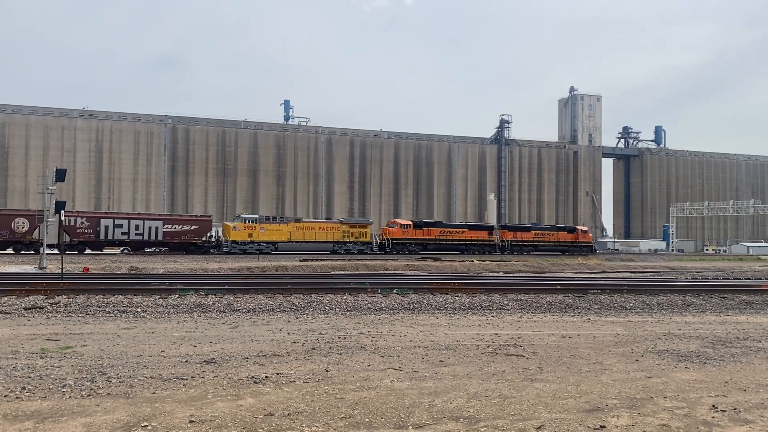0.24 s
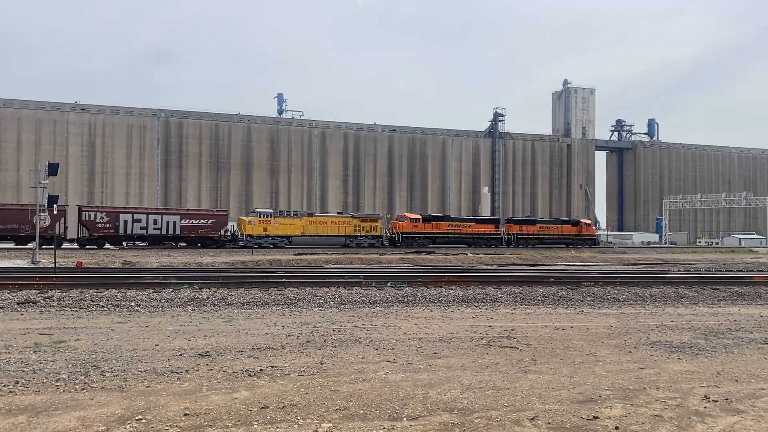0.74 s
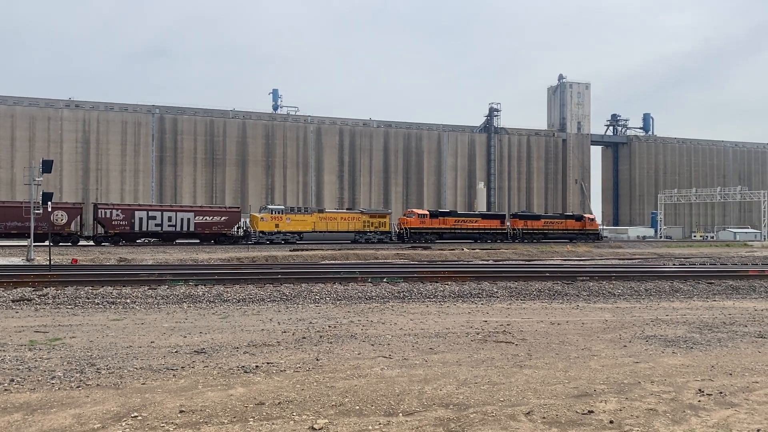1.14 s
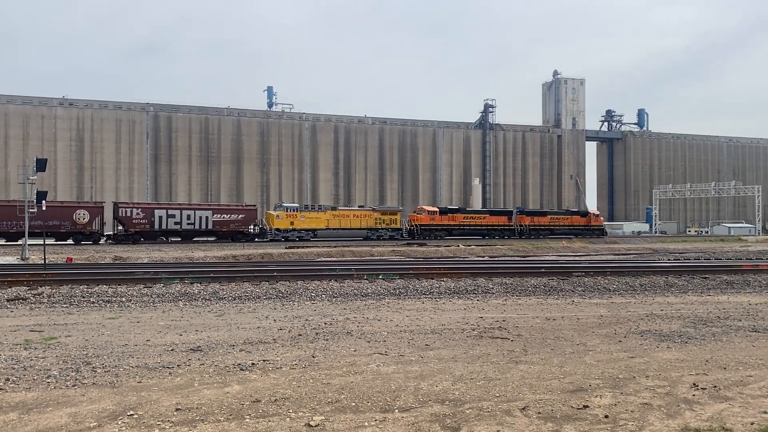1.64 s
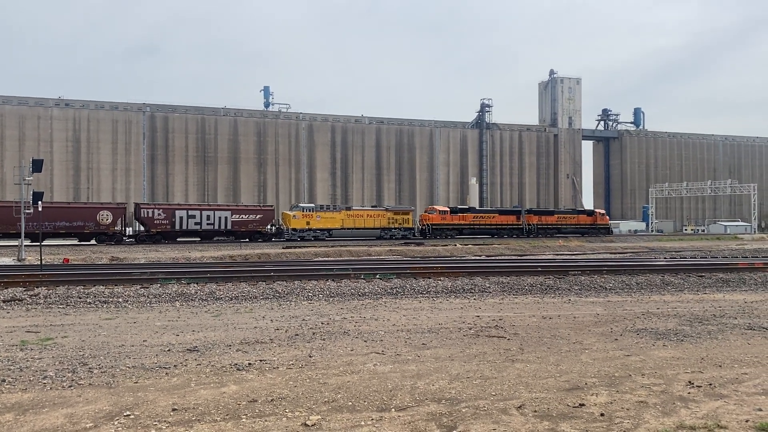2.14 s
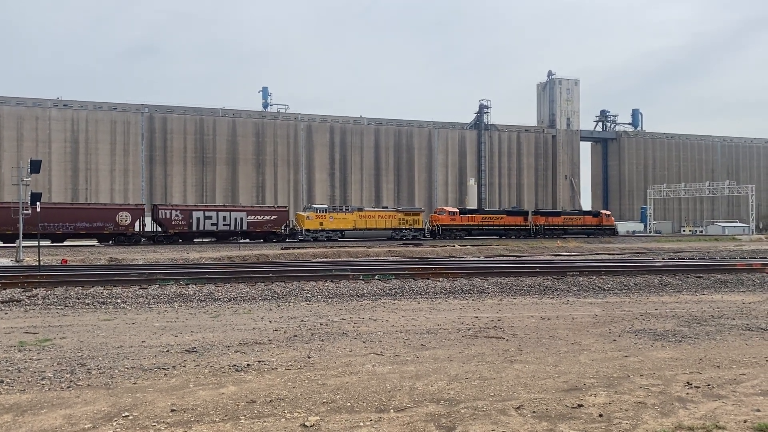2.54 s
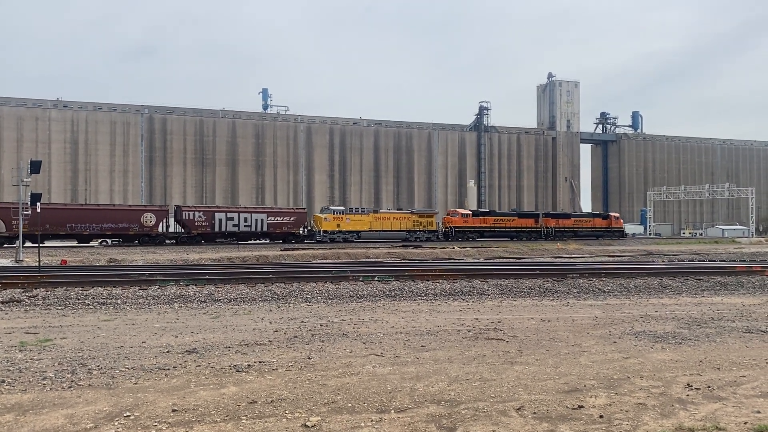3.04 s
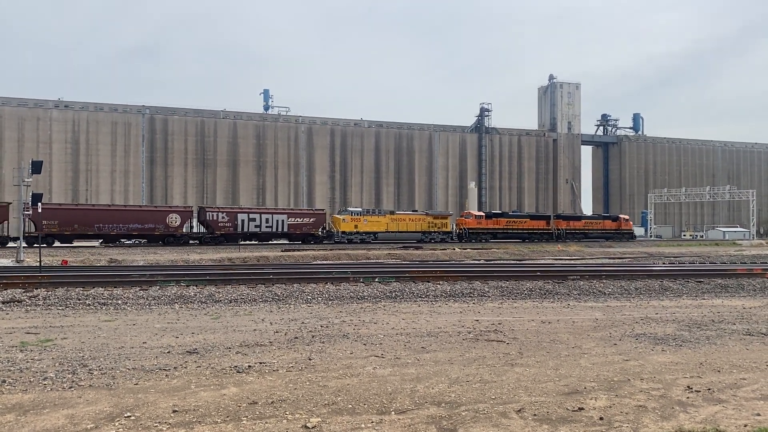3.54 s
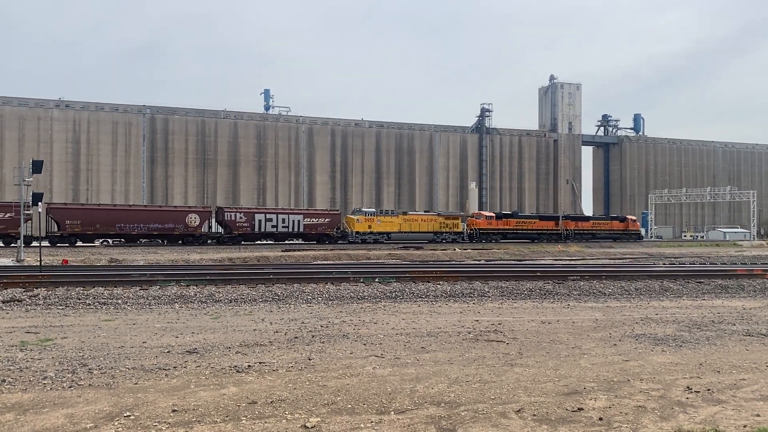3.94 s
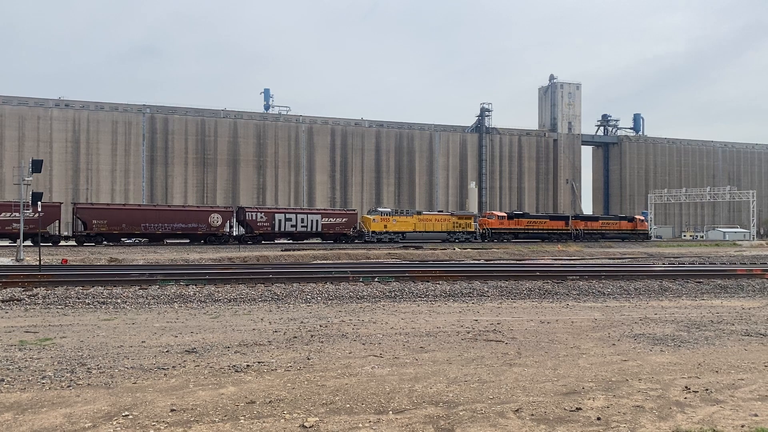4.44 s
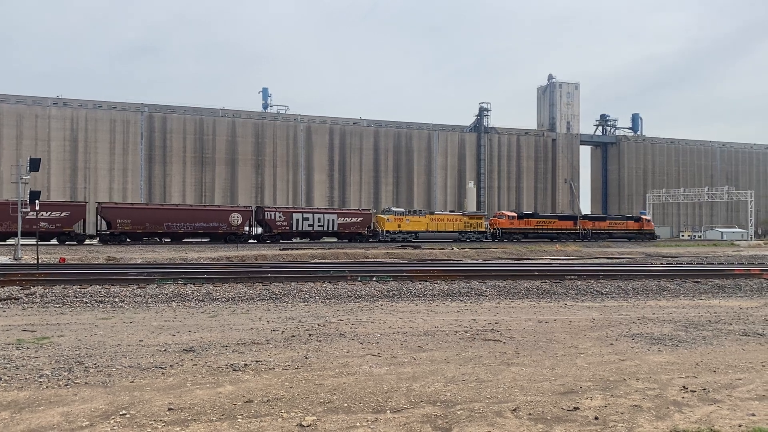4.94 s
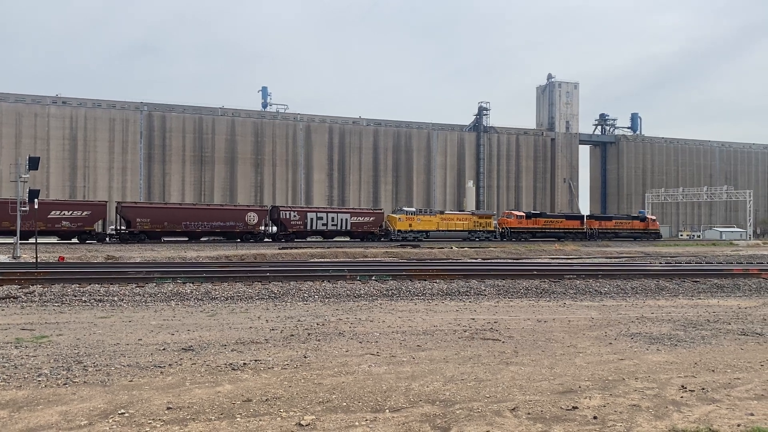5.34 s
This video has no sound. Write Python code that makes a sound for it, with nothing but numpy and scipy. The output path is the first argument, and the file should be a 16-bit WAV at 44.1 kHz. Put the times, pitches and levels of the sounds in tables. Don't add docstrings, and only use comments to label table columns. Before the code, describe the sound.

Two distant diesel locomotives throb low under gusty wind while freight wheels sing thinly on rails and couplers knock and ring in an open yard.

```python
import sys
import numpy as np
from scipy import signal
from scipy.fft import rfft, irfft, next_fast_len
from scipy.io import wavfile
from scipy.ndimage import uniform_filter1d

SR = 44100
rng = np.random.default_rng(int(sys.argv[2]) if len(sys.argv) > 2 else 0)


def boost_factor(decibels):
    exponent = np.asarray(decibels, float) / 20
    return 10 ** exponent


def materialize(psi):
    bounded = np.clip(np.atleast_2d(psi).T, -1, 1)
    quanta = np.round(bounded * 32767).astype(np.int16)
    wavfile.write(sys.argv[1], SR, quanta)


N = 246519
SPAN = next_fast_len(N)


def rms_one(x):
    return x / np.sqrt(np.mean(x ** 2) + 1e-20)


def in_time(rows):
    s, *columns = np.transpose(rows)
    return [np.interp(np.arange(N) / SR, s, c) for c in columns]


def at_hz(points, hz, axis=1):
    points = np.array(points)
    return np.interp(np.log(hz), np.log(points[:, 0]), points[:, axis])


def add(out, s, sound):
    at = int(s * SR)
    out[at:at + len(sound)] += sound[:N - at]


def drift(rate):
    r = np.exp(-80 * np.pi * rate / SR)
    chance = rng.standard_normal(N // 40 + 2002)
    slow = signal.lfilter([1], [1, -2 * r, r * r], chance)[2000:]
    return np.interp(np.arange(N) / 40, np.arange(len(slow)), rms_one(slow))


def coloured(spectrum, patchy_db, rate, modes=(), wake=1):
    hz = np.maximum(np.arange(SPAN // 2 + 1) * SR / SPAN, 1)
    low_hz, high_hz = spectrum[0][0], spectrum[-1][0]
    inside = (hz > low_hz) & (hz < high_hz)
    shaped = rfft(rng.standard_normal(SPAN)) * boost_factor(at_hz(spectrum, hz)) * inside
    boost = 1
    for top_hz, width, db in modes:
        boost = boost + (wake * boost_factor(db)) ** 2 / (1 + (2 * (hz - top_hz) / width) ** 2)
    shaped *= np.sqrt(boost)
    out, together = 0, drift(rate)
    for octave in range(int(np.log2(low_hz)), int(np.log2(high_hz)) + 2):
        share = np.maximum(1 - abs(np.log2(hz) - octave), 0)
        band = irfft(shaped * share, SPAN)[:N]
        out = out + band * boost_factor(patchy_db * (together + drift(rate)))
    return rms_one(out)


def evened(x, seconds, share):
    power = uniform_filter1d(x ** 2, max(int(seconds * SR), 1))
    return rms_one(x / (power + 1e-3) ** (np.clip(share, 0, 1) / 2))


def spell(s, length, rise, fall):
    t = np.arange(N) / SR - s
    return np.minimum(rise * t, 0) - fall * np.maximum(t - length, 0)


def ring(hz, db, t60, rise_s, size):
    age = np.arange(size) / SR
    modes = boost_factor(db - 60 * age / t60) * np.sin(2 * np.pi * hz * age)
    return (1 - np.exp(-age / rise_s)) * np.atleast_2d(modes).sum(axis=0)


def exhaust(orders, cycle_hz, start_s, level_db):
    turns = cycle_hz * (np.arange(N) / SR - start_s)
    waver_db = 0.7
    tones = 0
    for k, db in orders:
        tones = tones + boost_factor(db + waver_db * drift(0.35)) * np.cos(2 * np.pi * k * turns)
    return np.sqrt(2) * boost_factor(level_db) * tones


# t/s, lead engine level/dB, trailing engine level/dB
EXHAUST_LEVELS = [(0, -23, -41), (.6, -23, -40), (.85, -21.5, -40), (1.1, -23, -41), (1.4, -44, -42),
                  (1.8, -32, -36), (2.2, -25, -32), (2.6, -27, -28.5), (3.0, -27, -26), (3.4, -31, -25),
                  (3.8, -30, -26), (4.2, -29, -27.5), (4.6, -30, -24.5), (5.0, -33, -25.5),
                  (5.59, -42, -26)]
# multiple of the cycle rate, level/dB
LEAD_TONES = [(12, -9), (16, 0), (18, -10), (20, -16)]
# multiple of the cycle rate, level/dB
TRAILING_TONES = [(13, -8), (15, 0), (17, -2), (19, -14), (24, -13)]


def engines():
    lead_db, trailing_db = in_time(EXHAUST_LEVELS)
    lead = exhaust(LEAD_TONES, cycle_hz=4.4375, start_s=.0168, level_db=lead_db)
    trailing = exhaust(TRAILING_TONES, cycle_hz=4.434, start_s=.1015, level_db=trailing_db)
    return lead + trailing


# t/s, length/s, roar change level/dB, wind
# change level/dB
GUST_SWINGS = [(0.0, 0.055, -29, 10), (0.093, 0.059, 10.5, -3), (0.237, 0.12, 8.5, 4.5),
               (0.502, 0.15, 9, 10), (0.668, 0.16, 9, -1.5), (0.781, 0.09, -4, 8), (0.978, 0.048, 8, 5),
               (1.144, 0.12, 13, -5), (1.27, 0.085, 6, 14), (1.466, 0.074, -2, 2), (1.59, 0.088, -5, 7.5),
               (1.746, 0.12, -5, 7.5), (1.838, .13, 3, 4), (2.256, 0.58, 3.5, -1), (2.545, 0.29, 2, 1),
               (3.516, 0.23, 7, -2), (3.594, 0.066, -3, 5), (1.357, .06, -9, 7), (2.15, .08, -7, 4),
               (2.38, 0.071, -1, -12), (2.92, 0.099, -7, -0.5), (1.042, .05, -7, -2), (2.65, .08, 3, 1.5),
               (3.153, 0.095, -4, 4), (5.42, .3, 0.5, -1), (3.727, 0.11, 9, 4), (3.858, 0.064, 7.5, -1),
               (3.96, 0.042, 3, -4), (4.102, 0.072, -0.5, -4), (4.15, 0.17, 7.5, 3),
               (4.326, 0.051, 12.5, 1), (4.725, 0.056, 5, 4), (5.26, 0.12, 3.5, 4), (5.375, 0.14, 6.5, -8),
               (5.526, 0.11, 11, -30)]


def gusting():
    t = np.arange(N) / SR
    swells = np.array([np.maximum(1 - abs(t - s) / (0.65 * length), 0) for s, length, *_ in GUST_SWINGS])
    between_gusts_db = np.array([[-33.5], [-44]])
    return between_gusts_db + np.array(GUST_SWINGS)[:, 2:].T @ swells


# f/Hz, level/dB per Hz
ROAR_COLOUR = [(25, -22), (40, -7.5), (57, 2.5), (70, 3.5), (84, 4), (100, -2.5), (140, -10), (220, -19),
               (350, -30.5), (700, -35), (1000, -36), (1800, -74)]


def roar(level_db):
    return boost_factor(level_db + 5.5) * coloured(ROAR_COLOUR, patchy_db=.5, rate=2.6)


# f/Hz, level/dB per Hz
WIND_COLOUR = [(25, -36), (50, -4.5), (100, 1), (180, -8), (300, -10), (500, -29.5)]


def buffeting():
    return evened(coloured(WIND_COLOUR, patchy_db=0.0, rate=9.7), seconds=0.13, share=0.27)


def hum(hz, width):
    chance = rng.standard_normal(N)
    slow = signal.butter(2, 22, fs=SR, output="sos")
    wander = rms_one(signal.sosfilt(slow, chance))
    flicker = rms_one(signal.sosfilt(slow, chance[::-1]))
    pitch = hz + 0.7 * width * wander
    return rms_one(boost_factor(2.3 * flicker) * np.sin(2 * np.pi * np.cumsum(pitch) / SR))


# t/s, length/s, level/dB
FIRST_SONGS = [
    [(.02, 0.17, -47), (.3, 0.19, -49), (.58, 0.22, -52), (.9, 0.18, -49.5), (1.6, 0.25, -51.5),
     (2.0, 0.42, -57), (3.15, 0.019, -51), (3.3, 0.27, -43.5), (3.63, 0.021, -53), (3.72, 0.1, -42),
     (3.9, 0.027, -45), (4.03, .04, -46), (4.17, 0.13, -47)],
    [(.03, 0.096, -54.5), (.22, 0.18, -49.5), (.45, 0.22, -49), (.73, 0.17, -53), (.89, 0.15, -49.5),
     (1.08, 0.16, -49), (1.3, 0.21, -52), (1.6, 0.053, -53), (1.74, 0.05, -43.5), (1.98, 0.062, -53),
     (2.12, 0.061, -47.5), (2.25, 0.13, -51), (2.52, 0.12, -52.5), (2.9, 0.029, -54.5), (3.06, 0.1, -47.5),
     (3.24, 0.082, -52), (3.42, 0.14, -49.5), (3.72, 0.097, -48.5), (3.95, 0.068, -44.5), (4.14, 0.32, -49),
     (4.54, 0.062, -54), (4.67, 0.029, -46.5), (4.78, 0.11, -51.5), (4.97, 0.06, -56), (5.05, 0.078, -45.5),
     (5.28, 0.074, -52.5)],
]
# t/s, length/s, level/dB
OTHER_SONGS = [
    [(.06, .08, -53), (.42, 0.67, -54), (1.06, .03, -67), (1.15, 0.85, -56.5), (2.28, 0.081, -59),
     (2.47, 0.057, -50.5), (2.6, 0.048, -51), (2.73, .03, -52), (2.89, 0.035, -55), (3.22, 0.094, -50),
     (3.36, 0.076, -50.5), (3.48, .07, -51), (3.6, .4, -75), (3.97, 0.036, -48), (4.06, .03, -67),
     (4.14, 0.068, -48), (4.3, 0.14, -50), (4.5, 0.04, -48), (4.6, 0.044, -54), (4.8, 0.14, -58),
     (5.33, 0.068, -50), (5.55, .05, -53)],
    [(0, 0.98, -55), (1.6, .2, -65), (3.3, 0.74, -51), (4.125, 0.081, -48.5)],
    [(5.065, .12, -47), (5.2, .05, -55)],
    [(3.95, .1, -58), (4.33, .08, -54), (4.59, .06, -54)],
    [(.08, 0.047, -56), (.58, 0.032, -51), (.69, 0.079, -47.5), (.82, .08, -51), (.94, .02, -62),
     (3.4, 0.18, -51.5), (3.7, 0.52, -60)],
    [(.1, 0.089, -53), (.6, 0.22, -51), (.93, 0.18, -49.5), (3.6, 0.61, -54)],
]
# f/Hz, width/Hz, level/dB, which wheel (from 0)
WHEEL_TONES = [(1768, 22, -7, 0), (1846, 11, -2, 0), (2518, 6, 1, 1), (3924, 11, -1, 2), (4001, 11, 0, 6),
               (2214, 16, 0, 7), (4530, 30, -3, 3), (4620, 40, -5, 3), (3371, 8, 0, 4), (3603, 8, 0, 5)]
# f/Hz, width/Hz, level/dB
GEAR_TONES = [(472.4, 3.49, -52.5), (976, 9.4, -59), (1058, 2.9, -61), (1493, 13.4, -65.5),
              (2157, 7, -57.5), (3560, 25.5, -75)]


def singing():
    songs = []
    for wheel in FIRST_SONGS + OTHER_SONGS:
        song = boost_factor(-75)
        for s, length, db in wheel:
            song = song + boost_factor(db + spell(s, length, rise=195, fall=191))
        songs.append(song)
    tones = sum(boost_factor(db) * songs[int(wheel)] * hum(hz, width) for hz, width, db, wheel in WHEEL_TONES)
    gears = sum(boost_factor(db) * hum(hz, width) for hz, width, db in GEAR_TONES)
    return tones + gears


# t/s, level/dB
FLANGE_PRESSURE = [(0, -54), (.3, -53), (.55, -56.5), (.8, -53), (1.2, -58.5), (1.9, -55.5), (2.1, -63.5),
                   (2.53, -73), (2.9, -58), (3.2, -56), (3.45, -52), (4.1, -52.5), (4.3, -57), (4.8, -56),
                   (5.25, -60), (5.59, -62)]
# f/Hz, level/dB per Hz
ROLLING_COLOUR = [(210, -28), (350, -2.5), (729, 2), (882, -7.5), (1080, -5), (1720, -9.5), (2310, -10),
                  (2540, -9.5), (2800, -13), (3980, -14.5), (4320, -15.5), (6770, -29), (9000, -27),
                  (11700, -68), (19800, -120)]
# t/s, length/s, level/dB, swell over the length level/dB
BRAKE_SCRAPES = [
    (2.544, 0.25, -52, 4),
    (4.306, 0.061, -48, 1.5),
    (4.436, 0.053, -52, 8.5),
    (4.575, 0.049, -57.5, 2.5),
    (4.857, 0.081, -53, 3),
    (4.99, 0.1, -47, 1.5),
    (5.134, 0.036, -50, -11),
]
# f/Hz, level/dB per Hz
RUBBING_COLOUR = [(1500, -5), (2500, 0.5), (4000, 3), (5500, -1), (7500, -2.5), (9500, -3.5), (11500, -7),
                  (12700, -7.5), (13500, -12), (14300, -16), (15050, -14), (15350, -14), (15750, -39)]
# f/Hz, width/Hz, level over hiss/dB
WOKEN_MODES = [(2740, 90, 8), (3720, 120, 8), (4330, 60, 5), (4650, 120, 3), (5550, 50, 9), (6160, 25, 8),
               (6550, 30, 5), (7356, 20, 8), (7565, 25, 7), (8300, 30, 6), (9450, 25, 9), (9780, 25, 7),
               (10450, 20, 9), (11010, 25, 8), (11530, 30, 9), (12130, 25, 8), (12780, 30, 6),
               (14300, 40, 7), (15200, 40, 8)]


def rolling_and_rubbing():
    t, pressure_db = np.arange(N) / SR, in_time(FLANGE_PRESSURE)[0]
    recede_db_per_s, pressure_share = 0.43, 0.056
    rolling_db = -55 - recede_db_per_s * t + pressure_share * (pressure_db - pressure_db.mean())
    rolling = boost_factor(rolling_db + 15.5) * coloured(ROLLING_COLOUR, patchy_db=0.4, rate=25.0)
    grab_s, let_go_db_per_s = 0.0027, 136
    shoes = 0
    for s, length, db, swell_db in BRAKE_SCRAPES:
        swell = swell_db * np.clip((t - s) / length, 0, 1)
        shoes = shoes + boost_factor(db + swell + spell(s, length, 20 / grab_s, let_go_db_per_s))
    hiss = coloured(RUBBING_COLOUR, patchy_db=1.04, rate=13.2, modes=WOKEN_MODES[4:], wake=0.8)
    return rolling + np.hypot(boost_factor(pressure_db), shoes) * boost_factor(5.0) * hiss


# t/s, peak level/dB, f/Hz
WIND_SLAPS = [(0.236, -18, 85), (0.347, -17, 90), (3.477, -13.5, 97), (3.926, -22, 75), (0.981, -23, 84),
              (3.613, -20, 90), (3.705, -13.5, 87), (3.912, -13, 86), (2.106, -20, 74), (2.332, -13.5, 79),
              (1.138, -21, 85), (2.929, -23, 75), (4.062, -25, 80), (0.511, -21, 245), (1.085, -15, 162),
              (1.164, -12.5, 152), (1.272, -16.5, 260), (1.38, -19, 228), (1.586, -15.5, 122),
              (1.859, -25.5, 320), (4.184, -16, 192), (4.312, -20.5, 155)]


def slaps():
    out, age = np.zeros(N), np.arange(-1500, 1500) / SR
    for s, db, hz in WIND_SLAPS:
        rounded = np.exp(-(age * hz / 0.7) ** 2)
        add(out, s + age[0], -boost_factor(db) * np.cos(2 * np.pi * hz * age) * rounded)
    return out


# t/s, peak level/dB
FIRST_CONTACTS = [(0.5854, -32), (1.6994, -47), (1.718, -30), (2.5461, -38), (2.8355, -31), (2.847, -35),
                  (2.8604, -36), (3.9234, -41), (3.941, -29), (4.2906, -35), (4.8465, -37), (4.9901, -35),
                  (5.0104, -31), (5.0374, -24), (5.164, -25), (5.5804, -27)]


def ticks():
    out, age = np.zeros(N), np.arange(SR // 25) / SR
    t60_s = .03
    for (s, db), noise in zip(FIRST_CONTACTS, rng.standard_normal((len(FIRST_CONTACTS), len(age)))):
        add(out, s, boost_factor(db - 6 - 60 * age / t60_s) * noise)
    bright_hz = [3500, 12500]
    return signal.sosfilt(signal.butter(3, bright_hz, "band", fs=SR, output="sos"), out + 1e-18)


# t/s, peak level/dB, low part level/dB, burst t60/s, ring level/dB
COUPLER_KNOCKS = [(0.5902, -34.5, -6, 0.48, 11.5), (1.717, -29, -6, 0.34, 11.5), (2.546, -36, 5, 0.13, -3),
                  (2.8335, -36, -17, 0.14, -11), (3.926, -24, -20, 0.36, -5), (4.288, -35, -6, 0.13, -5),
                  (4.471, -42, -7, 0.43, 13), (4.5994, -30, -8, 0.066, 4), (4.8446, -33, -19, 0.14, -2),
                  (4.9906, -49, -28, 0.17, 6), (5.035, -24, -2, 0.24, 3), (5.166, -27, -14, 0.033, 1),
                  (5.58, -30.5, -16, 0.35, 7)]


def knocks():
    out, age = np.zeros(N), np.arange(SR // 3) / SR
    bright = coloured(RUBBING_COLOUR, patchy_db=3.0, rate=73.0, modes=WOKEN_MODES, wake=0.7)
    dull_colour = [(1700, 8.5), (2200, -29.5), (4500, -8.5), (5500, -44)]    # f/Hz, level/dB per Hz
    dull = coloured(dull_colour, patchy_db=-12.5, rate=178.0, modes=WOKEN_MODES[:4], wake=0.29)
    crowds = rng.random((len(COUPLER_KNOCKS), 3, 16, 1))
    for (s, db, low_db, t60, ring_db), (pitch, strength, life) in zip(COUPLER_KNOCKS, crowds):
        burst = (1 - np.exp(-age / 0.0046)) * boost_factor(db - 60 * age / np.clip(t60, .03, .3))
        grains = boost_factor(-7.5) * bright + boost_factor(low_db - 3.0) * dull
        rattle = grains[int(s * SR) - 150:][:len(age)]
        add(out, s - .002, burst[:len(rattle)] * rattle)
        crowd_hz, crowd_db = 6000 * 2.3 ** pitch, db + ring_db - 30 + 8 * strength
        add(out, s, ring(crowd_hz, crowd_db, .07 + .15 * life ** 2, .002, size=len(age)))
    return out


STEEL_PARTS = {"knuckle": [(2150, -3, .2), (2900, -5, .1), (4620, -1, .15), (5050, -4, .1), (5580, -1, .2)],
               "drawbar": [(2730, 0, .25), (3800, -2, .2), (5500, -1, .2), (11080, -10, .3)],
               "lever": [(3700, 0, .15), (4340, -4, .25), (5570, -1, .4), (11530, -11, .3)],
               "wheel": [(7359, -13, .6), (10440, -12, 1.0)], "plate": [(4135, 0, .4), (4318, 0, .4),
               (6142, -8, .4), (11010, -11, .5)], "pin": [(2110, -5, .09), (2600, -7, .06), (4450, -5, .08),
               (5690, -6, .05), (6600, -6, .06), (10480, -11, .8), (11200, -9, .08)],
               "yoke": [(2730, 0, .1), (2050, -7, .1)], "link": [(3710, 0, .09)], "bolt": [(5550, 0, .15)],
               "hook": [(4900, 0, .08), (5400, 2, .08)], "axle": [(3604, -3, .4)], "shoe": [(9450, -2, .5),
               (10430, -9, .5)], "clip": [(11530, 0, .5), (14217, -7, .4), (14780, -13, .3)],
               "rod": [(11050, 0, .3), (14325, -9, .2), (14950, -10, .5)], "latch": [(3860, 0, .1),
               (4380, -2, .12)], "cap": [(12130, 0, .2), (14325, -8, .3)], "chain": [(7900, 0, .4),
               (5150, -6, .3)]}
# t/s, part, level/dB
PART_STRIKES = [(.59, "chain", -58), (1.717, "knuckle", -46), (1.728, "knuckle", -45.5),
                (1.724, "lever", -45), (1.715, "wheel", -40), (1.756, "link", -50), (2.549, "chain", -52.5),
                (2.838, "pin", -51), (2.847, "pin", -42.5), (2.862, "pin", -70), (3.925, "yoke", -37.5),
                (3.926, "link", -51), (3.941, "drawbar", -45), (3.945, "axle", -56), (3.948, "bolt", -53),
                (4.277, "link", -54), (4.292, "shoe", -46), (4.303, "link", -37), (4.312, "lever", -49),
                (4.33, "axle", -59), (4.43, "link", -41.5), (4.455, "bolt", -62), (4.47, "drawbar", -49),
                (4.487, "bolt", -51), (4.5, "lever", -48.5), (4.85, "shoe", -41), (4.992, "chain", -56),
                (5.002, "drawbar", -56), (5.01, "bolt", -49), (5.038, "drawbar", -48),
                (5.04, "yoke", -37.5), (5.038, "hook", -41.5), (5.052, "wheel", -37), (5.056, "plate", -47),
                (5.1, "plate", -55), (5.153, "plate", -58), (5.16, "bolt", -55), (5.195, "bolt", -57),
                (3.94, "rod", -45.5), (4.288, "clip", -48), (4.475, "clip", -48), (4.51, "rod", -51),
                (4.845, "cap", -52), (5.012, "cap", -50), (5.012, "rod", -53), (5.056, "rod", -46),
                (5.13, "rod", -54), (5.2, "rod", -52), (1.716, "clip", -49), (3.927, "latch", -41),
                (4.31, "latch", -48), (4.99, "chain", -53), (1.72, "latch", -48), (1.735, "plate", -58),
                (4.31, "bolt", -54), (4.52, "clip", -56)]


def steel():
    out, shaking = np.zeros(N), boost_factor(3.0 * drift(30.0))
    spread, clank_t60_s, clank_db = .022, .15, 1.0
    apart = rng.uniform(-1.176, 1, (len(PART_STRIKES), 4))
    for (s, part, db), steps in zip(PART_STRIKES, apart):
        hz, mode_db, t60 = np.transpose(STEEL_PARTS[part])[:, :, None]
        short_t60 = np.minimum(clank_t60_s, t60)
        for step in steps:
            near_hz = hz * (1 + spread * step)
            add(out, s, ring(near_hz, db + mode_db + clank_db, short_t60, .004, size=SR // 5))
        add(out, s, ring(hz, db + mode_db + 3.0, t60, .004, size=SR // 2))
    return out * shaking


# middle t/s, length/s, middle f/Hz, glide/Hz per s, level/dB
SPARROW_CHIRPS = [
    (.778, .125, 3865, 2200, -45),
    (1.013, .125, 3880, 300, -46),
    (2.073, .036, 4080, -22000, -44),
]


def sparrows():
    out = np.zeros(N)
    arch_hz_per_s2, edge_db = 72000, -6
    for s, length, hz, glide, db in SPARROW_CHIRPS:
        age = np.arange(-length / 2, length / 2, 1 / SR)
        pitch = hz + glide * age - arch_hz_per_s2 * age ** 2
        level = boost_factor(db + edge_db * (2 * age / length) ** 2) * np.hanning(len(age)) ** 0.06
        add(out, s - length / 2, level * np.sin(2 * np.pi * np.cumsum(pitch) / SR))
    return out


def scattered_paths(sound):
    age = np.arange(SPAN // 2 + 1) / SR
    t60_s = .3
    echoes = rfft(rng.normal(0, 1, len(age)) * boost_factor(-60 * age / t60_s), SPAN)
    return irfft(rfft(sound, SPAN) * echoes / abs(echoes), SPAN)[:N]


def scene():
    roar_db, wind_db = gusting()
    train = roar(roar_db) + singing() + rolling_and_rubbing() + knocks() + sparrows()
    shared_wind = boost_factor(wind_db + 7.5) * buffeting()
    differing_wind = boost_factor(wind_db + 9.5) * buffeting()
    direct = engines() + train + shared_wind + slaps() + steel() + ticks()
    return np.array([direct, scattered_paths(train) + differing_wind])


def band_limit(x):
    return signal.sosfilt(signal.butter(12, 16550, fs=SR, output="sos"), x)


# f/Hz, left-right likeness (0 to 1), right leads by/radians, left minus right level/dB
PORT_DIFFERENCES = [(60, .87, -.03, 1.2), (200, .75, -.05, 1.7), (345, .68, -.1, 0), (520, .4, -.5, 4),
                    (700, .35, 0, 4), (1100, .1, .8, 0), (1450, .05, .5, .5), (1780, .7, 1.1, 1),
                    (2100, .6, 0, 1.5), (2500, .85, 0, 0), (2800, .65, -1.1, 2.5), (3270, .35, -1.6, 3),
                    (3450, .05, 0, 3), (3620, .85, .3, 0), (4150, .9, -.1, -.5), (4480, .4, -1.2, 2.5),
                    (4700, .15, -1.4, 3.5), (5150, .1, .8, 4.5), (5450, .7, .3, 4.5), (5900, .62, -.4, 2.5),
                    (6500, .78, -.45, 2.5), (7050, 1, 0, 0), (8000, .97, .1, .5), (9000, 1, .15, -.1)]


def record(dry):
    hz = np.maximum(np.arange(SPAN // 2 + 1) * SR / SPAN, 1)
    alike = np.clip(at_hz(PORT_DIFFERENCES, hz), 0, 1)
    treble_hz, turn_hz = 7050, 4100
    lead = at_hz(PORT_DIFFERENCES, hz, axis=2) + 2 * np.pi * np.maximum(hz - treble_hz, 0) / turn_hz
    direct, scattered = rfft(dry, SPAN) * np.sqrt([(1 + alike) / 2, (1 - alike) / 2])
    tilt = boost_factor(at_hz(PORT_DIFFERENCES, hz, axis=3) / 2)
    left = (direct + scattered) * tilt
    right = (direct - scattered) / tilt * np.exp(1j * lead)
    return band_limit(irfft([left, right], SPAN)[:, :N])


dry = scene()
out = record(dry)
materialize(out)
```